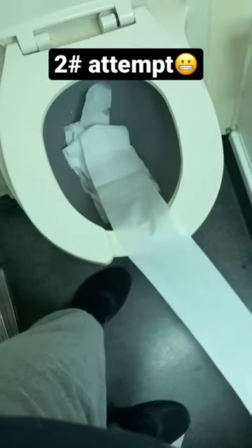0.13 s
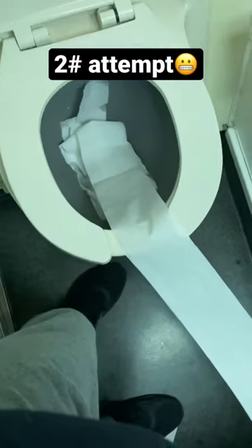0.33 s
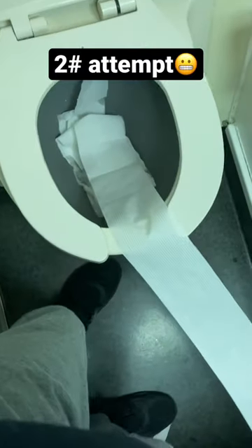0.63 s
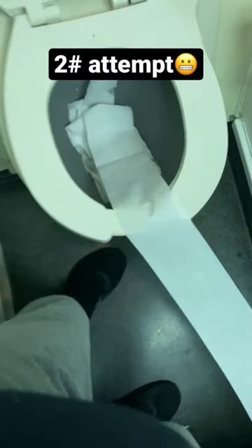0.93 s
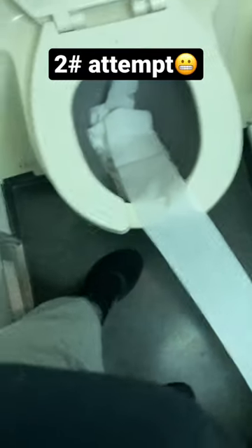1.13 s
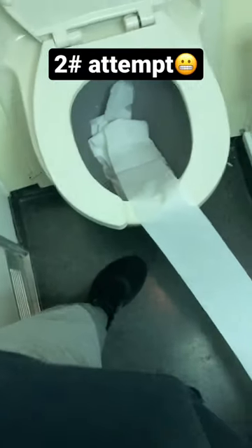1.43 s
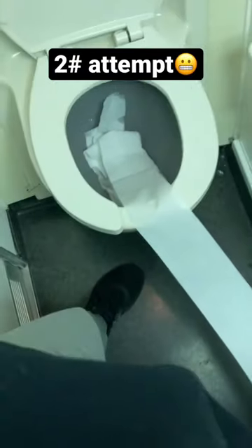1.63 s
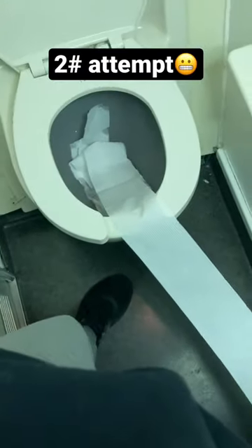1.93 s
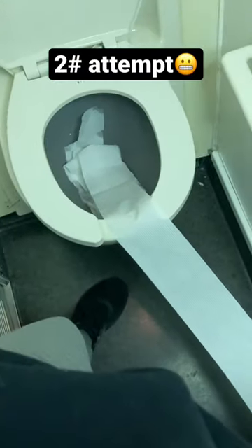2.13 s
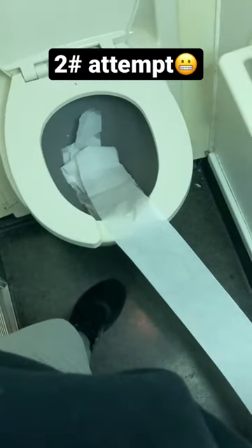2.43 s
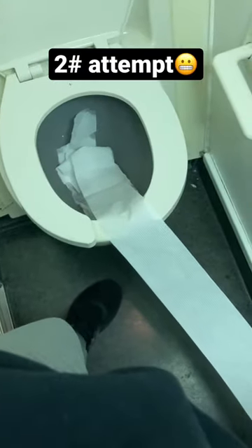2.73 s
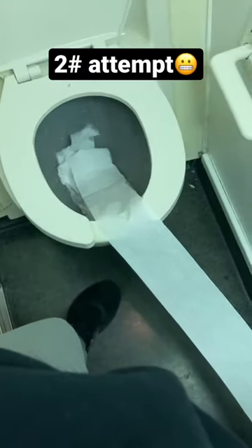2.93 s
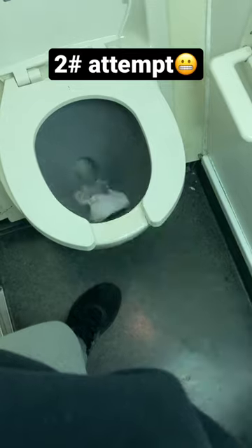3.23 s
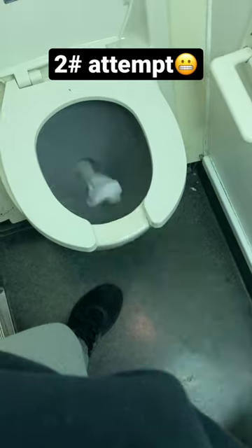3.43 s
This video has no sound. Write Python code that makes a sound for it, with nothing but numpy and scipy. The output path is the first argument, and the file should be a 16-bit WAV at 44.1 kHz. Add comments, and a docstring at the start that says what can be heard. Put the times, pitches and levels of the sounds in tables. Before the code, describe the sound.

A vacuum toilet flushes in a cramped cabin lavatory: low drone and rumble with a few clicks, a brief spitting hiss sliding down, then a loud hollow gulp and softer rushing, in close stereo from above the bowl.

```python
"""A vacuum toilet flushes in a small cabin lavatory, heard in stereo from above the bowl.
First come wavering machine tones over noise rumble, and button and fittings click as decaying noise.
Rinse jets then hiss and spit as flickering noise, while an echoed hiss and a breathy note slide down.
The valve opens: air gulps paper and water down the drain, noise ringing the resonances of bowl and
pipe. It rushes on more softly, the drone and rumble now lower than before."""
import sys
import numpy as np
from scipy import signal
from scipy.fft import rfft, irfft, next_fast_len
from scipy.io import wavfile
from scipy.ndimage import uniform_filter1d

SR = 44100
rng = np.random.default_rng(int(sys.argv[2]) if len(sys.argv) > 2 else 0)


def transcribe(signal):
    """Save signal, clipped to [-1, 1], as a 16-bit WAV file at the path in sys.argv[1]."""
    frames = np.atleast_2d(signal).T
    limited = np.clip(frames, -1, 1)
    pcm = np.round(limited * 32767).astype(np.int16)
    wavfile.write(sys.argv[1], SR, pcm)


N = 158319
TIME = np.arange(N) / SR
BINS = np.maximum(np.fft.rfftfreq(N, 1 / SR), 1)  # Hz, kept above 0 for the logarithm

# In every colour table level_db is per hertz and only relative: noise() scales the whole to rms 1.


def from_db(db):
    """Decibels to gain."""
    return 10 ** (np.asarray(db) / 20)


def rms_one(x):
    """Scale to unit rms."""
    return x / np.sqrt(np.mean(x ** 2) + 1e-20)


def in_time(rows):
    """Each column of a curve at every sample."""
    start_s, *columns = np.transpose(rows)
    return [np.interp(TIME, start_s, column) for column in columns]


def swell(rows):
    """Gain of a level curve, silent before its first point."""
    return from_db(in_time(rows)[0]) * (TIME >= rows[0][0])


def by_pitch(rows):
    """Each column of a table at every frequency, interpolated along log pitch."""
    pitch_hz, *columns = np.transpose(rows)
    return [np.interp(np.log(BINS), np.log(pitch_hz), column) for column in columns]


def white():
    """Two unrelated white noises."""
    return rng.standard_normal((2, N))


def noise(colour):
    """Two unrelated coloured noises, rms 1."""
    gain = from_db(by_pitch(colour)[0])
    return rms_one(irfft(rfft(white()) * gain, N))


def drift(rate_hz):
    """Slow chance with rms 1: noise whose spectrum is 6 dB down at rate_hz."""
    size = next_fast_len(N)
    hz = np.fft.rfftfreq(size, 1 / SR)
    slow = rfft(rng.standard_normal(size)) / (1 + (hz / rate_hz) ** 2)
    return rms_one(irfft(slow, size)[:N])


def breathy(phase, rate_hz):
    """A tone made only of drifting sine and cosine parts, so its level and phase wander."""
    return drift(rate_hz) * np.sin(phase) + drift(rate_hz) * np.cos(phase)


def flicker(depth_db, rate_hz):
    """Random gain with rms 1."""
    return rms_one(from_db(depth_db * drift(rate_hz)))


def evened(x):
    """Hold the short-term level at rms 1."""
    window_s = 0.02
    power = uniform_filter1d(x ** 2, int(window_s * SR), axis=-1)
    return x / np.sqrt(power + 1e-12)


def resonate(x, modes):
    """Parallel resonances, each applied twice for dark valleys; white noise about keeps its level."""
    out, power = 0, 0
    for pitch_hz, width_hz, level_db in modes:
        r = np.exp(-np.pi * width_hz / SR)
        peak = (1 - r * r) / 2
        section = [peak, 0, -peak, 1, -2 * r * np.cos(2 * np.pi * pitch_hz / SR), r * r]
        ringing = signal.sosfilt([section, section], x + 1e-18)
        out = out + from_db(level_db) * ringing
        power += peak / 2 * from_db(level_db) ** 2
    return out / np.sqrt(power)


def burst(start_s, t60_s):
    """Quick attack and exponential decay, 60 dB down after t60_s."""
    attack_s = 0.001
    age = np.maximum(TIME - start_s, 0)
    return np.minimum(age / attack_s, 1) * np.exp(-np.log(1000) * age / t60_s)


# Machine tones in the cabin: pitch_hz, level_db (before the curve below), waver (share of the tone)
DRONE_TONES = [(46, -18.5, 0.14), (93.7, -25, 0.92), (138.67, -22.5, 0.15), (169.5, -30, 0.53),
               (247, -31.5, 0.5)]
# The drone sinks under the flush: start_s, level_db
DRONE_SINKS = [(0, -2.5), (.55, -1), (1.1, 0), (1.6, 0), (2.7, -4), (2.9, -11), (3.1, -18.5), (3.59, -25.5)]
# Colour of the cabin rumble: pitch_hz, level_db
RUMBLE_COLOUR = [(20, -5), (35, -14), (60, -2.5), (85, 1), (120, -5.5), (160, -3.5), (205, -9.5), (260, -2),
                 (370, -11.5), (500, -7), (650, -18.5), (880, -16.5), (1050, -27.5), (1300, -24),
                 (2000, -30), (3100, -43), (4600, -37), (6200, -48), (9000, -50), (15500, -65)]
# Level curve of the rumble, which sinks too and partly returns: start_s, level_db
RUMBLE_SINKS = [(0, -0.5), (1.3, 0), (2.4, 0.5), (2.76, 0.5), (2.92, -2.5), (3.06, -12.5), (3.28, -13),
                (3.59, -6.5)]
RUMBLE_DB = -19.5  # before its curve
DRONE_WANDER_HZ, WANDER_RATE_HZ, WAVER_RATE_HZ = 0.48, 2.55, 5.5


def cabin():
    """Wavering machine tones, placed in the shared signal only, over a broad rumble."""
    out = from_db(RUMBLE_DB) * noise(RUMBLE_COLOUR) * swell(RUMBLE_SINKS)
    for pitch_hz, level_db, waver in DRONE_TONES:
        wandering_hz = pitch_hz + DRONE_WANDER_HZ * drift(WANDER_RATE_HZ)
        phase = 2 * np.pi * np.cumsum(wandering_hz) / SR
        tone = np.sin(phase) + waver * breathy(phase, WAVER_RATE_HZ)
        out[0] += from_db(level_db) * rms_one(tone) * swell(DRONE_SINKS)
    return out


# Clicks and taps of button and fittings:
# start_s, snap_db, clack_db, knock_db, t60_s, clack_hz
CLICK_TIMES = [(.272, -58, -28.5, -37, 0.097, 2160), (.416, -40, -63, -61, .04, 3000),
               (0.797, -32, -34, -48, .057, 2280), (0.912, -23.5, -20, -14, 0.032, 3260),
               (0.924, -33.5, -33, -15.5, 0.15, 2470), (1.159, -39, -66, -51, .12, 3000),
               (2.613, -47, -21.5, -45, 0.12, 2740)]
# Colour of the bright snap: pitch_hz, level_db
SNAP_COLOUR = [(300, -32), (1500, -3), (2400, 11.5), (3600, 7.5), (5200, 8), (8500, 4.5), (12000, -3),
               (15300, -3)]
# Colour of the dull knock: pitch_hz, level_db
DULL_COLOUR = [(200, -30), (390, 5), (600, -9), (770, 1), (1200, -14), (3000, -40)]
CLACK_WIDTH_HZ = 810  # each pass


def clicks():
    """Each click is a bright snap, a clack at its own pitch and a dull knock that die away together."""
    snap, knock, out = noise(SNAP_COLOUR), noise(DULL_COLOUR), 0
    for start_s, snap_db, clack_db, knock_db, t60_s, clack_hz in CLICK_TIMES:
        clack = resonate(white(), [(clack_hz, CLACK_WIDTH_HZ, 0)])
        mix = from_db(snap_db) * snap + from_db(clack_db) * clack + from_db(knock_db) * knock
        out = out + burst(start_s, t60_s) * mix
    return out


# Hiss of jets, then of air: start_s, level_db
HISS_CURVE = [(2.43, -59), (2.5, -40), (2.758, -33.5), (2.775, -15), (2.802, -17), (2.814, -29),
              (2.83, -14.5), (2.852, -22), (2.862, -15.5), (2.885, -18), (2.935, -20.5), (3.04, -43.5),
              (3.15, -35.5), (3.176, -30.5), (3.2, -33.5), (3.33, -35.5), (3.48, -30), (3.59, -34)]
# Colour of the rinse jets: pitch_hz, level_db
RINSE_COLOUR = [(500, -44), (1300, -3), (2500, -9.5), (4400, -8), (5800, -1.5), (8500, 1), (11000, 3),
                (13000, 4), (14200, -1), (15600, 0)]
# Colour of the air at the drain: pitch_hz, level_db
DRAIN_AIR_COLOUR = [(500, -21), (2500, 2.5), (4500, -3), (6000, -2.5), (8200, 3), (12000, -2.5),
                    (13500, -6.5), (15600, -6.5)]
JET_GRAIN_DB, AIR_GRAIN_DB, GRAIN_RATE_HZ = 3, 1.4, 68
VALVE_OPENS_S, VALVE_TRAVEL_S = 2.947, 0.047


def hiss():
    """Spitting rinse jets give way to a smoother hiss of air as the valve opens."""
    opened = np.clip((TIME - VALVE_OPENS_S) / VALVE_TRAVEL_S, 0, 1)
    jets = noise(RINSE_COLOUR) * flicker(JET_GRAIN_DB, GRAIN_RATE_HZ)
    air = noise(DRAIN_AIR_COLOUR) * flicker(AIR_GRAIN_DB, GRAIN_RATE_HZ)
    return swell(HISS_CURVE) * (np.sqrt(1 - opened) * jets + np.sqrt(opened) * air)


# Main peak of the hollow hiss, sliding down as the rinse builds: start_s, pitch_hz
HOLLOW_PITCH = [(2.62, 5000), (2.72, 3920), (2.76, 3560), (2.81, 3200), (2.9, 2530), (2.97, 2330)]
# Level of the hollow hiss: start_s, level_db
HOLLOW_LEVEL = [(2.44, -45), (2.52, -36.5), (2.66, -38), (2.76, -27.5), (2.93, -37.5), (2.97, -51)]
# Colour of the hiss before its echoes: pitch_hz, level_db
HOLLOW_COLOUR = [(700, -20), (1400, -5), (2600, -9.5), (4400, -2), (6500, -10), (9000, -16)]
ECHO_GAIN = 0.6  # for each round trip


def sweep():
    """Hiss mixed with its echoes in a lengthening cavity, so that its peaks and hollows slide down."""
    round_trip_s = 2 / in_time(HOLLOW_PITCH)[0]  # two periods of the main peak
    hollow = 0
    source = noise(HOLLOW_COLOUR)
    for trips in range(3):
        heard_from = TIME - trips * round_trip_s
        echo = np.array([np.interp(heard_from, TIME, row) for row in source])
        hollow = hollow + ECHO_GAIN ** trips * echo
    return swell(HOLLOW_LEVEL) * rms_one(hollow)


# Breathy whistle on the main peak of the hollow hiss: start_s, level_db
WHISTLE_CURVE = [(2.67, -44), (2.78, -46), (2.92, -40), (2.99, -68)]
WHISTLE_SPREAD_HZ = 130  # to either side, where the note is 6 dB down


def whistle():
    """The cavity's main resonance sings as a narrow, breathy note that falls."""
    phase = 2 * np.pi * np.cumsum(in_time(HOLLOW_PITCH)[0]) / SR
    note = np.array([breathy(phase, WHISTLE_SPREAD_HZ) for _ in range(2)])
    return swell(WHISTLE_CURVE) * evened(note)


# Booming air in the bowl: start_s, level_db
BOOM_CURVE = [(2.91, -36), (2.942, -22), (2.952, -17.5), (2.98, -6.5), (3.015, -32), (3.035, -13),
              (3.1, -15), (3.14, -9), (3.175, -14.5), (3.223, -11), (3.31, -30), (3.44, -31), (3.48, -23),
              (3.525, -16), (3.55, -38.5), (3.59, -25.5)]
# Resonances of bowl and pipe: pitch_hz, width_hz (each pass), level_db (relative)
BOWL_RESONANCES = [(252.4, 50, 3), (312.6, 23, 4), (382.2, 18, 3), (459.4, 27, 0.5), (506.6, 54, -11.5)]
# Rushing in the pipe: start_s, level_db
RUSH_CURVE = [(2.935, -41), (2.952, -12), (3.015, -27.5), (3.045, -19), (3.12, -18), (3.145, -26),
              (3.172, -19.5), (3.22, -20.5), (3.3, -31), (3.45, -30), (3.505, -23), (3.59, -36.5)]
# Resonances of the drain pipe: pitch_hz, width_hz (each pass), level_db (relative)
PIPE_RESONANCES = [(698, 26, 5), (742, 35, 1), (850, 50, 6), (920, 50, -1), (1262, 70, 3), (1527, 60, 2),
                   (1632, 42, 0), (1760, 48, -1), (1926, 34, 1), (2048, 38, -4), (2200, 80, -6),
                   (2410, 90, -10), (2610, 80, -9), (2920, 160, -9)]
# Colour of the turbulence that escapes the resonances: pitch_hz, level_db
ESCAPED_COLOUR = [(40, -15), (70, -3), (140, -12), (300, -9), (800, 0.5), (1100, -21), (1400, -6),
                  (2800, -8.5), (3600, -17), (8000, -31.5)]
FLUTTER_DB, FLUTTER_RATE_HZ = 3, 27
LEAK_DB, SLUG_INTO_PIPE_DB = -9.5, -11


def suction():
    """Gulping air booms in the bowl; its fluttering rush and the slugs it drags ring the drain pipe."""
    rush = flicker(FLUTTER_DB, FLUTTER_RATE_HZ) * swell(RUSH_CURVE)
    splats = slugs()
    bowl = swell(BOOM_CURVE) * evened(resonate(white(), BOWL_RESONANCES))
    pipe = resonate(rush * white() + from_db(SLUG_INTO_PIPE_DB) * splats, PIPE_RESONANCES)
    leak = from_db(LEAK_DB) * rush * noise(ESCAPED_COLOUR)
    return bowl + pipe + splats + leak


# Slugs of water and paper hit the drain:
# start_s, level_db, t60_s, pitch_hz (centre), width_hz (each pass)
SLUG_HITS = [(2.946, -9.5, 0.033, 1640, 1060), (2.947, -11.5, 0.024, 610, 342),
             (2.959, -6.5, 0.018, 1400, 350), (2.96, -23, 0.061, 2490, 1710),
             (2.994, -11.5, 0.1, 1510, 680), (3.001, -3, .11, 481, 197), (3.106, -14.5, 0.032, 1710, 880),
             (3.152, -13.5, 0.04, 1330, 159), (3.16, -25.5, 0.1, 2730, 2200),
             (3.184, -9.5, 0.033, 820, 348)]


def slugs():
    """Each slug is a short splat of noise in a band of its own."""
    out = 0
    for start_s, level_db, t60_s, pitch_hz, width_hz in SLUG_HITS:
        splat = evened(resonate(white(), [(pitch_hz, width_hz, 0)]))
        out = out + from_db(level_db) * burst(start_s, t60_s) * splat
    return out


ROOM_T60_S, FIRST_ECHO_S = 0.037, 0.0074
ROOM_DB, ROOM_LOW_HZ = -3.5, 602  # reflections fade out below ROOM_LOW_HZ


def lavatory(x):
    """Dense, short reflections from the close walls colour everything above the bass."""
    tail = white() * from_db(-60 * TIME / ROOM_T60_S) * (TIME > FIRST_ECHO_S)
    tail /= np.sqrt(np.sum(tail ** 2, axis=1, keepdims=True))
    wet = from_db(ROOM_DB) / (1 + (ROOM_LOW_HZ / BINS) ** 4)
    spectrum = (1 + wet * rfft(tail)) / np.sqrt(1 + wet ** 2)
    response = irfft(spectrum, N)[:, :N // 10]
    return signal.fftconvolve(x, response, axes=1)[:, :N]


# Stereo image by pitch: pitch_hz, likeness (0-1), lead_rad (phase by which the left leads)
STEREO_IMAGE = [(150, .9999, 0), (250, .99, 0), (360, .95, .3), (520, .8, .3), (630, .2, -1),
                (760, .55, -2.3), (1300, .85, -2.45), (2000, .65, -2.8), (3400, .3, -3.4),
                (4300, .45, -4.2), (5050, .96, -3.35), (5450, .995, -3.14), (5850, .97, -2.95),
                (6800, .72, -1.5), (7800, .97, -.2), (9100, .97, .2), (10200, .7, 1.6), (11300, .98, 3.0),
                (12300, .98, 3.3), (13300, .62, 4.6), (14100, .98, 6.2)]
LEFT_DB = 0.4  # left louder than right


def stereo(x):
    """The first signal is in both channels, the second is diffuse; left and right differ in phase by pitch."""
    alike, lead_rad = by_pitch(STEREO_IMAGE)
    alike = np.clip(alike, 0, 1)
    sides = np.array([[1], [-1]])  # left, right
    shared, diffuse = rfft(x)
    both = np.sqrt((1 + alike) / 2) * shared + sides * np.sqrt((1 - alike) / 2) * diffuse
    turned = both * np.exp(1j * sides * lead_rad / 2)
    return irfft(turned, N) * from_db(sides * LEFT_DB / 2)


def scene():
    """Everything heard from above the bowl; the cabin sound skips the lavatory's reflections."""
    inside = clicks() + hiss() + sweep() + whistle() + suction()
    return stereo(cabin() + lavatory(inside))


CEILING, CUTOFF_HZ = 0.92, 15900


def record(dry):
    """The highest peaks are rounded and the top of the treble is cut steeply."""
    rounded = dry / (1 + (dry / CEILING) ** 6) ** (1 / 6)
    # order 12, 0.1 dB ripple, 80 dB down above the cutoff
    lowpass = signal.ellip(12, 0.1, 80, CUTOFF_HZ, fs=SR, output="sos")
    return signal.sosfilt(lowpass, rounded)


dry = scene()
out = record(dry)
transcribe(out)
```